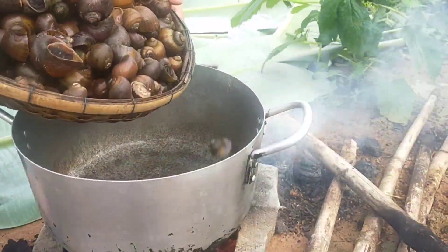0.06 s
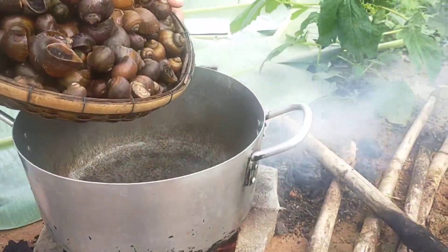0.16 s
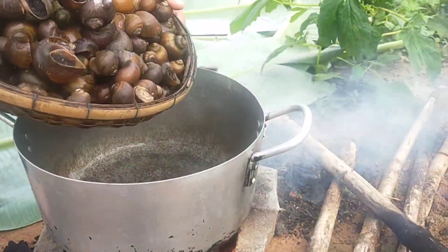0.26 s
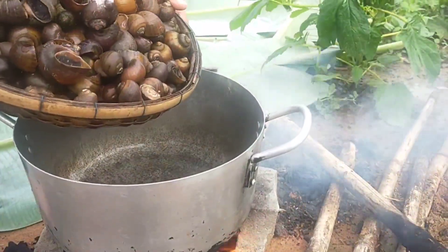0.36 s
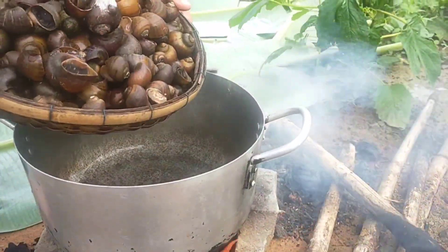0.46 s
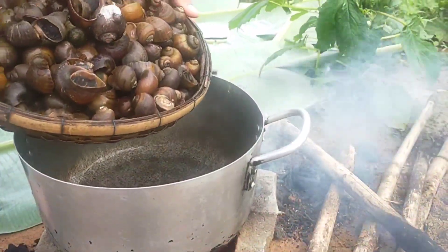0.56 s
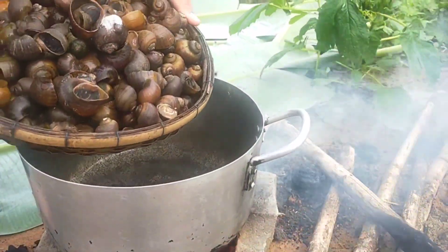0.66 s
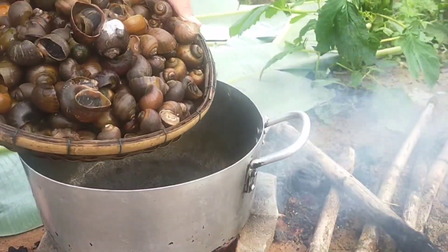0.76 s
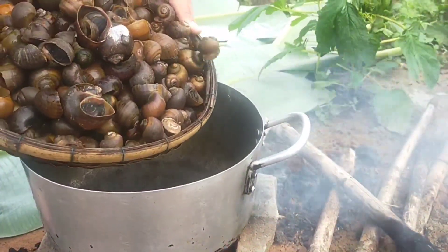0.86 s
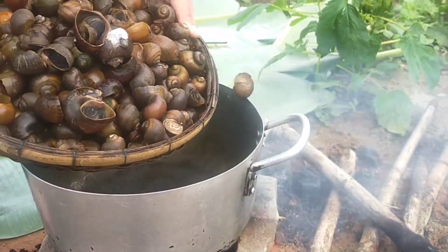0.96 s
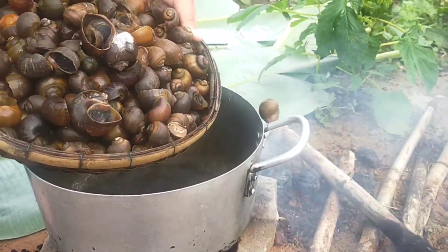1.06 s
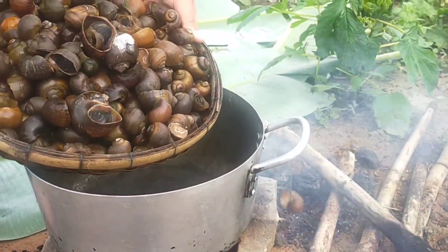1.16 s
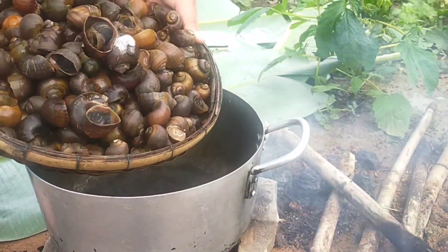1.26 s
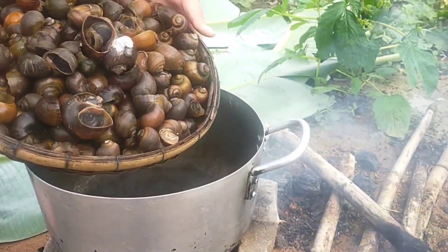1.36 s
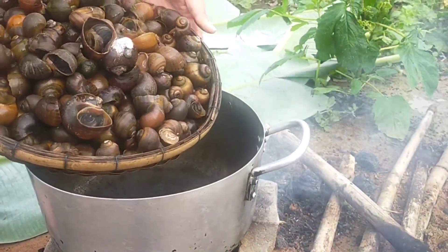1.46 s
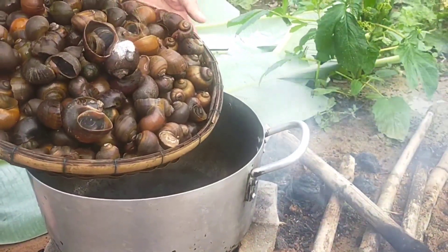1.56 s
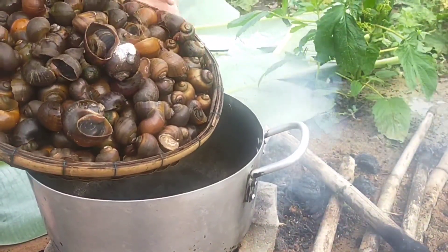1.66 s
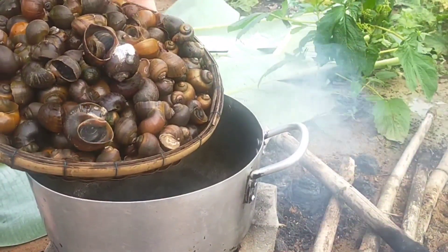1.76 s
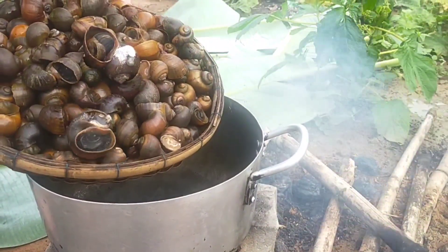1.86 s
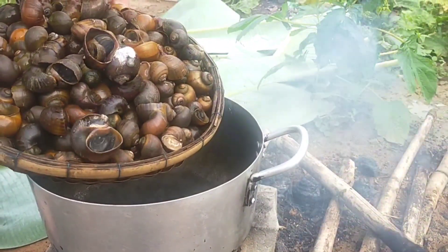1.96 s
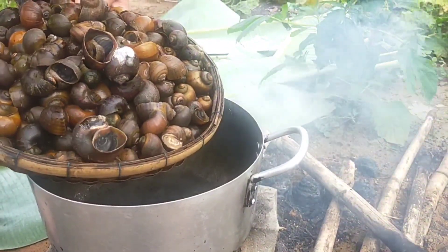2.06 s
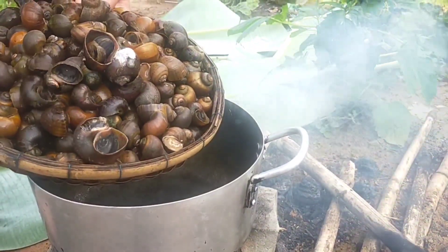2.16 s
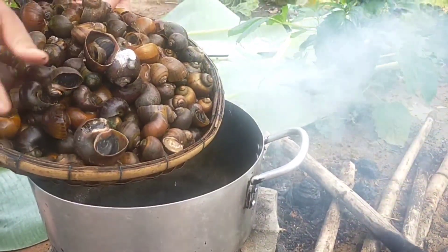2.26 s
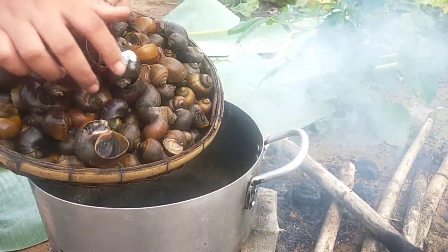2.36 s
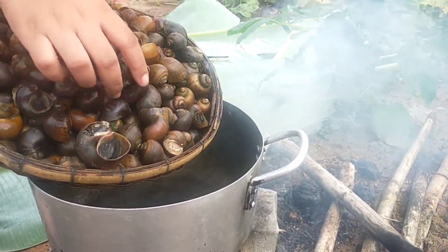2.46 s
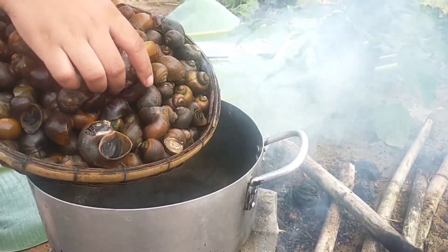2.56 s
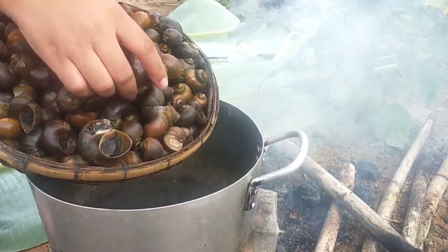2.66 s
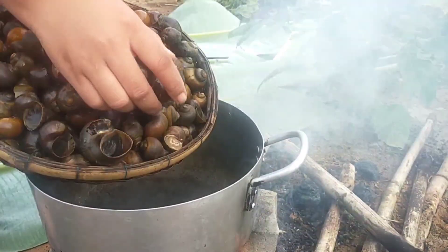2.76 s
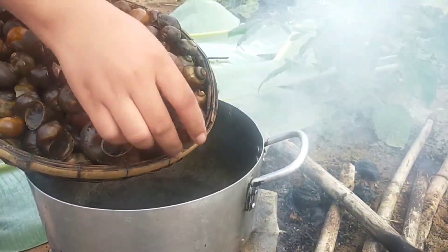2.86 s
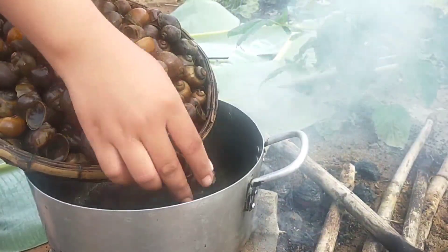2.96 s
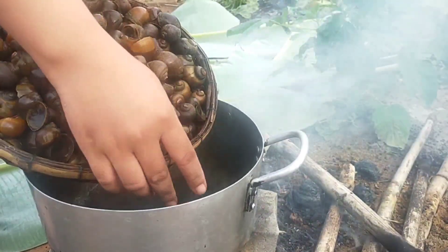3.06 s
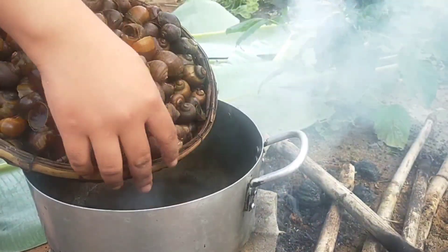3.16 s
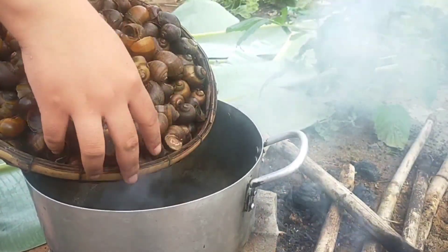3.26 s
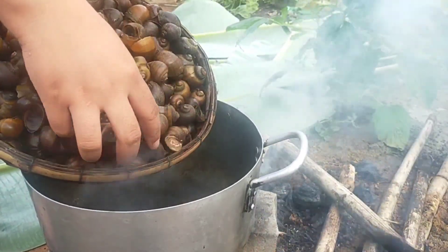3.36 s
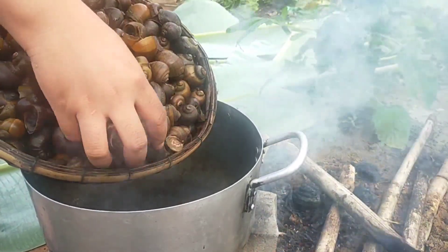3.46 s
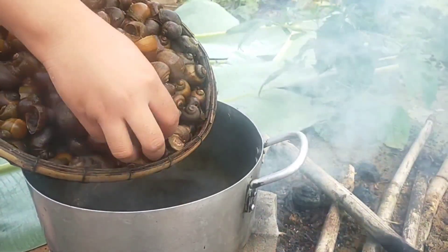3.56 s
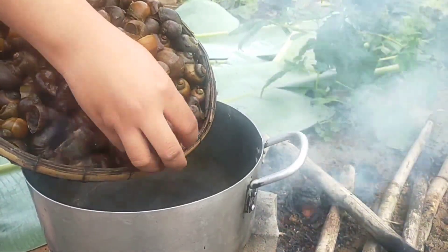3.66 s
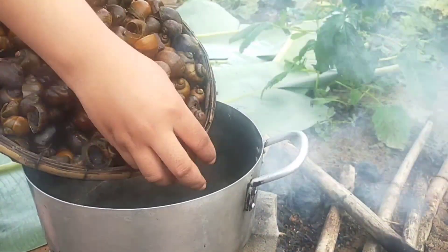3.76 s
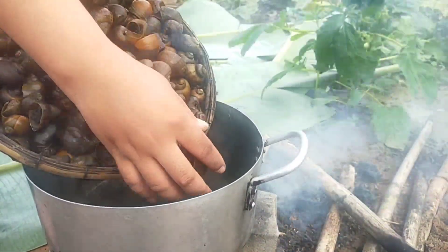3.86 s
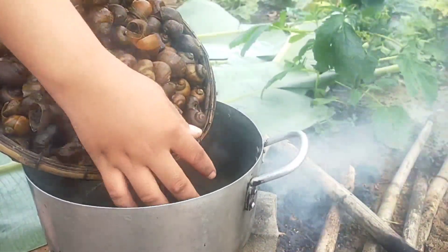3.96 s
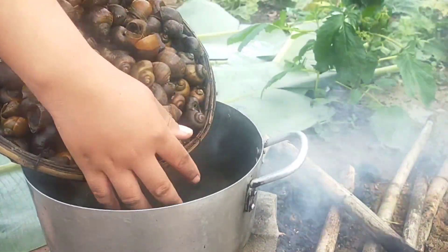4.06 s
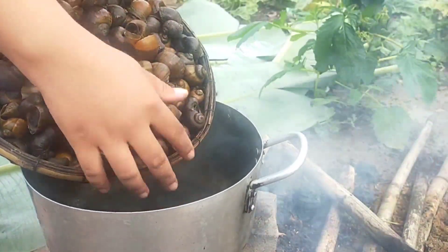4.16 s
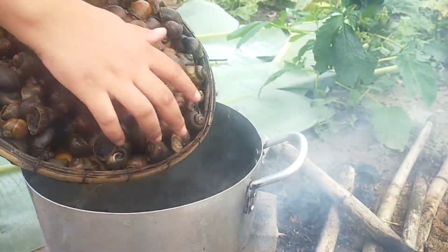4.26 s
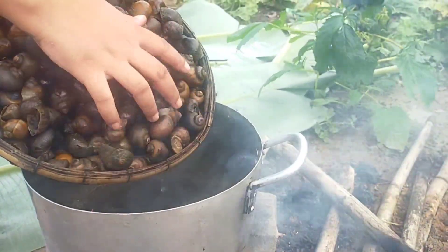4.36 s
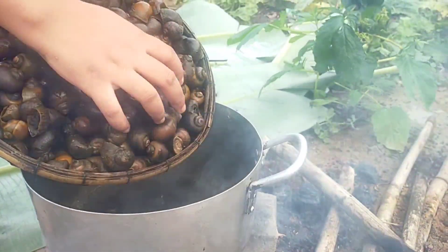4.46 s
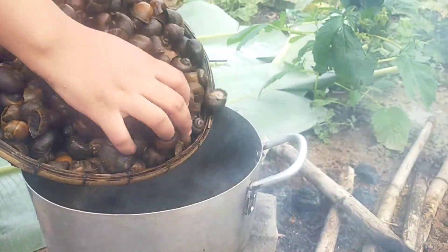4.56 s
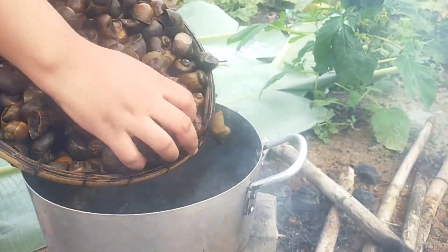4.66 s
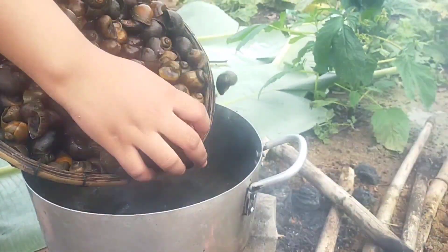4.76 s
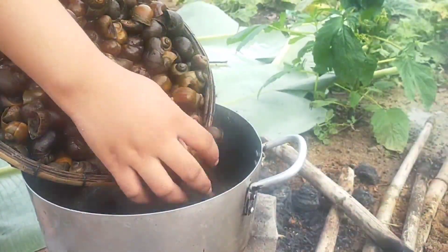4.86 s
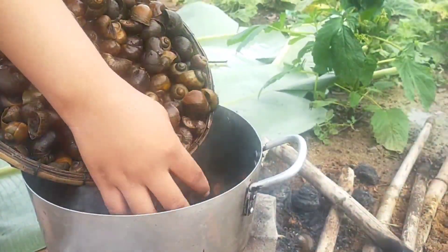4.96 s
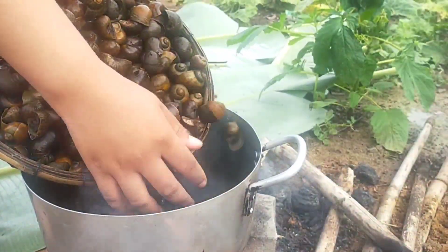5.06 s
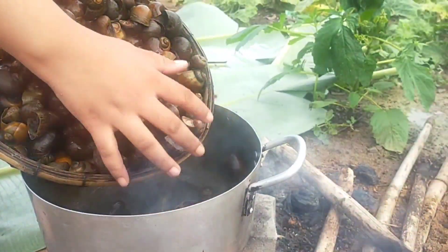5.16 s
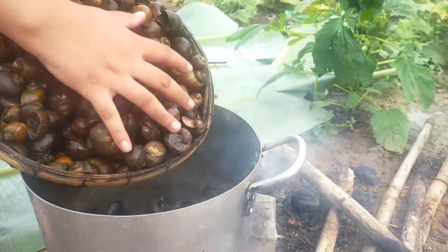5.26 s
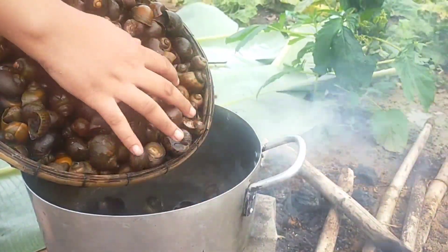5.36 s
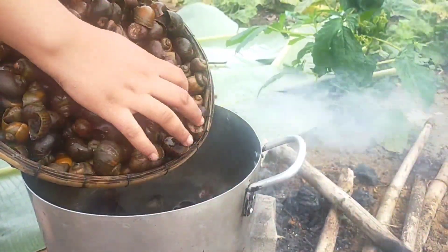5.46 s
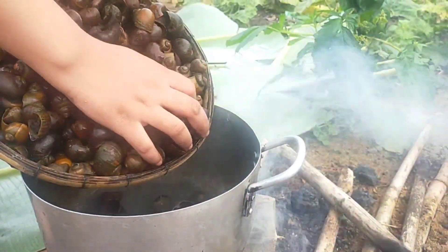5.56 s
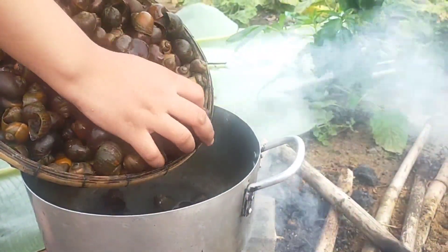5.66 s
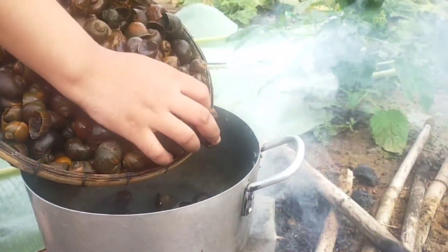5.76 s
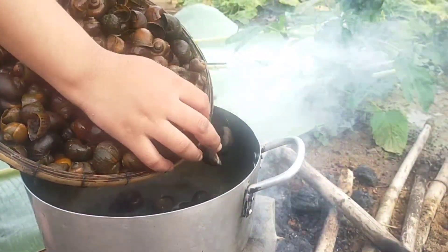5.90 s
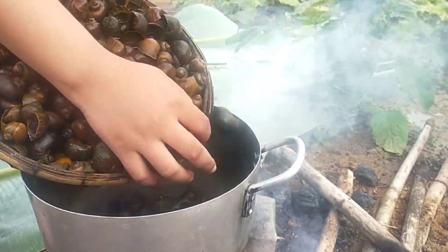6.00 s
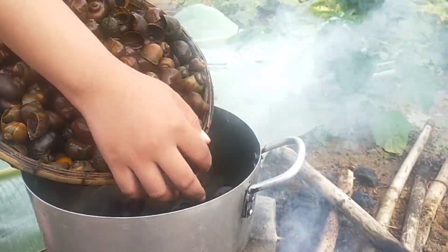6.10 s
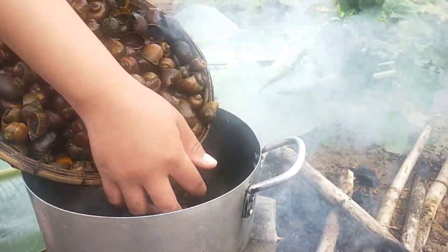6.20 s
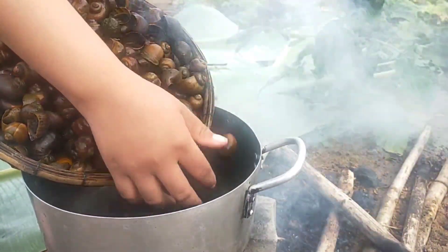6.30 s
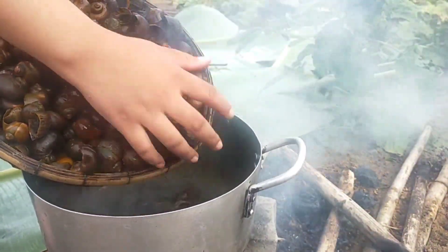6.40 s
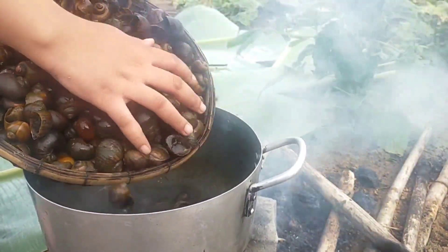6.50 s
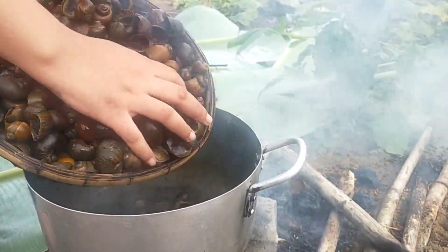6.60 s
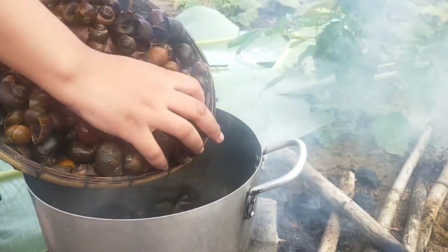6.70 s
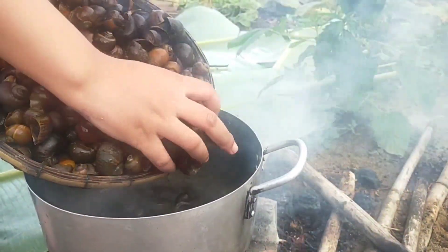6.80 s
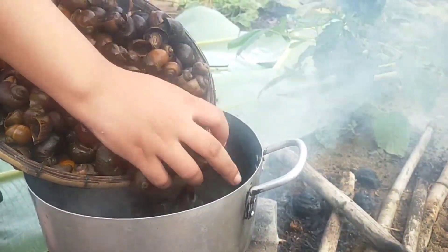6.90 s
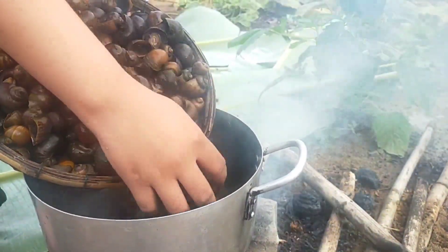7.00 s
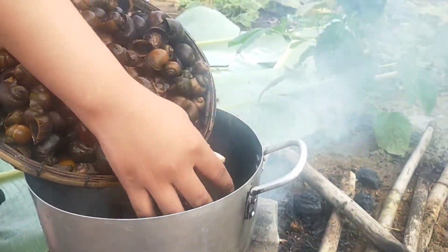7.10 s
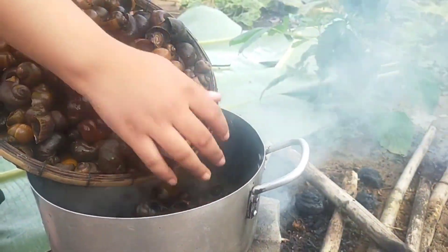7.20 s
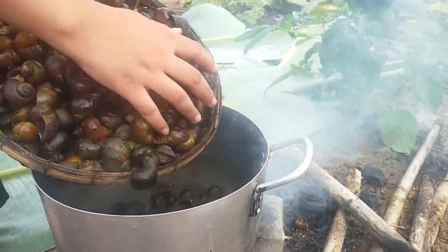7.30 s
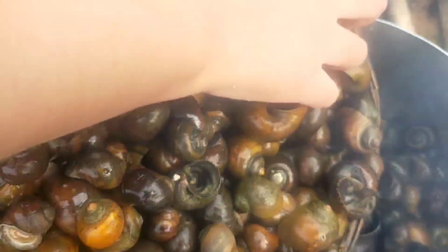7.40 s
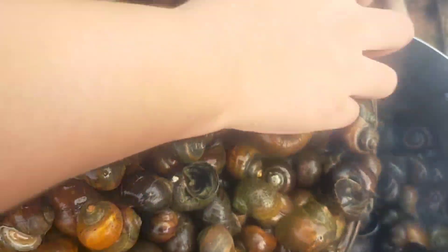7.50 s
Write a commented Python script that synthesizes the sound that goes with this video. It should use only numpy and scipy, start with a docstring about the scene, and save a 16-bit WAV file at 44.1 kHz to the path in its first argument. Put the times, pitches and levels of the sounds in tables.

```python
"""Outdoors, a steady fire hiss with insects and a low wind rumble come first, over shells ticking in a basket.
Snail shells are raked from the woven basket into a thin metal pot: they clack as short swelling partials,
thump the bottom and ring the wall as decaying modes, which are damped as the pot fills.
One quick scatter of touches hums on the wall, shells rub in the basket, a low hum swells, a bird calls once
as a falling whistle. The wind picks up late, and a bright swish of shaped noise passes close by at the end."""
import sys
import numpy as np
from scipy import signal
from scipy.fft import rfft, irfft, next_fast_len
from scipy.io import wavfile
from scipy.ndimage import uniform_filter1d, minimum_filter1d, map_coordinates

SR = 44100
rng = np.random.default_rng(int(sys.argv[2]) if len(sys.argv) > 2 else 0)


def wav_record(signal):
    """Record a signal, one row per channel, as 16-bit PCM in the file named by sys.argv[1]."""
    frames = np.transpose(np.atleast_2d(signal))
    bounded = np.clip(frames, -1, 1)
    # unit amplitude maps onto the largest positive 16-bit level
    quanta = np.round(bounded * 32767).astype(np.int16)
    wavfile.write(sys.argv[1], SR, quanta)


N = 332514


def amp(db):
    """Gain of a level in dB."""
    return 10 ** (np.asarray(db) / 20)


def unit(x):
    """Scaled to rms 1."""
    return x / np.sqrt(np.mean(x ** 2) + 1e-20)


def curves(rows):
    """One value per sample for each column after the time."""
    s, *cols = np.transpose(rows)
    return [np.interp(np.arange(N) / SR, s, c) for c in cols]


def wobble(rate):
    """A smooth random curve, rate knots a second."""
    knots = rng.standard_normal(int(N * rate / SR) + 4)
    return map_coordinates(knots, [np.arange(N) * rate / SR])


def noise(spectrum):
    """Noise of rms 1 coloured by (frequency [Hz], level [dB]) points, close to silent outside them."""
    m = next_fast_len(N)
    f, db = np.transpose(spectrum)
    log_f = np.log(np.fft.rfftfreq(m, 1 / SR) + 1)
    gain = amp(np.interp(log_f, np.log(f + 1), db, -120, -120))
    return unit(irfft(rfft(rng.standard_normal(m)) * gain, m)[:N])


def place(s, rows, size=N):
    """Sums one short sound per row at the times s."""
    at = np.round(s * SR).astype(int)[:, None] + np.arange(rows.shape[1])
    return np.bincount(at.ravel(), rows.ravel(), size + SR)[:size]


# fire hiss and insects in the open air: (frequency [Hz], relative level per Hz [dB])
AIR_SPECTRUM = [(150, -74), (250, -33), (303, -3.5), (407, 6.5), (1240, 0.5), (1450, 2), (3060, 10.5),
                (6940, -16.5), (9490, -22), (11100, -1.5), (16000, -70)]


def fire_and_insects():
    """Fire hiss and insects: one coloured noise whose level wavers a little, slowly and quickly."""
    return amp(-55 + .8 * wobble(3) + .8 * wobble(14)) * noise(AIR_SPECTRUM)


# low wind: (frequency [Hz], relative level per Hz [dB])
WIND_SPECTRUM = [(12, -61), (20, -28), (43, -3), (118, -6), (176, -11.5), (234, -17), (300, -25.5),
                 (390, -77), (660, -120)]
GUST_S, GUST_DB = 6.35, 4.5  # time the wind picks up [s], its gain [dB]


def wind_rumble():
    """Wind as wavering low noise that grows over 0.3 s when it picks up."""
    gust_db = GUST_DB * np.clip((np.arange(N) / SR - GUST_S) / .3, 0, 1)
    return amp(-55.5 + gust_db + wobble(1) + wobble(13)) * noise(WIND_SPECTRUM)


def shells(s, size, hz, t60, rise, spread, count=3):
    """Hollow shells: a few close partials around the pitch that swell and die fast; size is the peak."""
    t = np.arange(SR // 30) / SR
    c = rng.standard_normal((len(s), count, 3))
    part_hz = hz[:, None] * np.exp(spread * np.tanh(c[..., 0]) * np.arange(count) / 2)
    life = np.clip(t60 * np.exp(0.2 * c[..., 1]), .005, .06)
    shape = amp(-60 * t / life[..., None]) * (1 - np.exp(-t / rise))
    part_gain = amp(-4.0 * np.arange(count))[:, None]
    partials = np.sin(2 * np.pi * part_hz[..., None] * t + 9 * c[..., 2:])
    tone = (shape * part_gain * partials).sum(1)
    return place(s, tone * (size / np.abs(tone).max(1))[:, None])


def bursts(s, size, t60, rise=0.00063):
    """Envelope of sharp noise bursts."""
    t = np.arange(SR // 16) / SR
    return place(s, size[:, None] * amp(-60 * t / t60) * (1 - np.exp(-t / rise)))


# shells shifting in the basket: (time [s], level [dB], shell pitch [Hz])
BASKET_TICKS = [(0.021, -31.5, 2400), (0.06, -32.5, 2440), (0.105, -35, 2430), (0.1259, -30.5, 2200),
                (1.3125, -9.5, 2443), (1.361, -43, 1810), (1.4047, -37.5, 1660), (1.567, -35.5, 1940),
                (1.854, -34.5, 2620), (1.873, -40, 2610), (1.8932, -38, 2500), (1.9453, -34.5, 2630),
                (2.0707, -41.5, 2400), (2.235, -29.5, 2100), (2.3046, -45.5, 2460), (2.35, -36, 2350),
                (2.4273, -34.5, 2250), (2.4466, -26, 2490), (2.474, -34.5, 2630), (2.536, -30.5, 2840),
                (2.561, -30, 2790), (2.58, -31, 1430), (2.5975, -21.5, 2630), (2.7007, -40.5, 2200),
                (2.7821, -19, 3470), (2.8303, -29, 2550), (2.8598, -30, 2570), (2.9573, -43, 1730),
                (2.974, -41, 1740), (3.007, -32.5, 2210), (3.098, -26, 2930)]


def ticks():
    """In the basket a contact is only the shell and a short dry crack."""
    s, db, hz = np.transpose(BASKET_TICKS)
    body = shells(s, amp(db), hz, t60=0.032, rise=0.00014, spread=0.393, count=4)
    dry_noise = noise([(400, -42), (1000, 1.0), (3000, 11.0), (6000, -12.5), (16000, -39.0)])
    return body + bursts(s, amp(db - 2.0), 0.024) * dry_noise


def ring(modes, s, size, scatter_db, hz0=None, count=N):
    """Blows ring every mode at a new strength, most of all those near the striker's own pitch hz0."""
    chance = rng.standard_normal((len(s), len(modes)))
    out = np.zeros(count)
    for (hz, db, t60), c in zip(modes, chance.T):
        r, w = amp(-60 / (np.clip(t60, .01, .5) * SR)), 2 * np.pi * hz / SR
        near_db = 0 if hz0 is None else -7 * np.abs(np.log2(hz / hz0))
        sign = np.sign(np.sin(9 * c))  # a blow pushes a mode either way
        strength = size * amp(db + near_db + scatter_db * c) * sign
        blows = place(s, strength[:, None], count)
        out += signal.lfilter([0, np.sin(w)], [1, -2 * r * np.cos(w), r * r], blows)
    return out


# modes of the bare pot wall: (relative level [dB], 60 dB decay time [s])
WALL_MODES = [(-8.5, 0.15), (-19, 0.13), (-14.5, 0.17), (-8, 0.21), (-7.5, 0.17), (-6, 0.43), (-20, 0.15),
              (-15, 0.43), (-14.5, 0.28), (-18, .15), (-6, 0.29), (-12.5, 0.1), (-12.5, 0.4), (-12, .22),
              (-6.5, 0.3), (-14, 0.087), (-18, 0.35), (-9.5, 0.22), (-14, 0.29), (-13.5, .22), (-16, 0.21),
              (-13.5, 0.29), (-13, 0.24), (-15, 0.054), (-11.5, 0.074)]
# pitch of each of those modes on the bare wall: [Hz]
WALL_PITCHES = [1035, 1105, 1225, 1351, 1521, 1669, 1793, 1886, 1970, 2040, 2162, 2250, 2338, 2532, 2590,
                2835, 2977, 3135, 3208, 3451, 3682, 3872, 4414, 4603, 5313]
# the pot filling up: (time [s], share of the wall covered by shells [0 to 1])
COVERED = [(0, 0.037), (1.5, 0.18), (3.1, 0.48), (4.2, 0.71), (7.54, 0.98)]
SAG, DETUNE, DAMPING = .011, 0.0201, 3.1  # covered wall: mean pitch fall, pitch scatter, extra damping [ratios]
SETTLE_S = .3  # the heap lies differently against the wall this often [s]


def pot_wall(s, size, hz):
    """Shells against the wall damp it and split each mode in two; the pitches shift whenever the heap settles."""
    out = np.zeros(N + SR)
    length = SR * 3 // 4
    db, t60 = np.tile(np.transpose(WALL_MODES), 2)
    for k in range(int(N / SR / SETTLE_S) + 1):
        start = k * SETTLE_S
        fill = np.clip(np.interp(start, *np.transpose(COVERED)), 0, 1)
        shift = fill * (DETUNE * rng.standard_normal(len(db)) - SAG)
        tuned = np.tile(WALL_PITCHES, 2) * (1 + shift)
        modes = np.transpose([tuned, db - 3.5, t60 / (1 + DAMPING * fill)])
        now = s // SETTLE_S == k
        ringing = ring(modes, s[now] - start, size[now], scatter_db=5.0, hz0=hz[now], count=length)
        out[round(start * SR):][:length] += ringing
    return out[:N]


# modes of the pot bottom: (frequency [Hz], relative level [dB], 60 dB decay time [s])
BOTTOM_MODES = [(432.8, -3.5, 0.074), (500.5, -1, 0.04), (653, -2.5, 0.021), (1004, -13.5, 0.092)]


def pot_bottom(s, size, scatter_db):
    """The bottom drums in a few low modes at every blow."""
    return ring(BOTTOM_MODES, s, size, scatter_db)


# crack of shell on shell in the pot: (frequency [Hz], relative level per Hz [dB])
CRACK_SPECTRUM = [(530, -10.5), (900, -21.5), (1020, -2), (1120, -17.5), (2120, -0.5), (8660, -36.5),
                  (10800, -33), (16000, -44)]


def crack_noise(treble_only=False):
    """Noise of a cracking contact, over the whole band or with only the treble above 3 kHz."""
    if not treble_only:
        return noise(CRACK_SPECTRUM)
    bright = [(f, d) for f, d in CRACK_SPECTRUM if f > 3000]
    return noise([(3000, -10)] + bright)


# crowd drag: rattle gained per doubling [dB], span [s], delay [s], weight of a clack's level
DRAG_DB, DRAG_S, DRAG_LAG_S, DRAG_WEIGHT = 7.5, 0.029, 0.016, 0.53


def crowd(s):
    """How many shells are falling around the times s, loud ones counting more; they drag small ones along."""
    at, db = np.transpose(SHELL_FALLS)[:2]
    near = np.exp(-((s[:, None] - at - DRAG_LAG_S) / DRAG_S) ** 2)
    return (amp(DRAG_WEIGHT * db) * near).sum(1)


# how hard the heap is tipped and raked: (time [s], relative rattle level [dB])
RAKE_FORCE = [(0.1, -70), (.28, -39), (.48, -63), (.56, -44.5), (.8, -59.5), (.9, -60.5), (1.3, -80),
              (1.9, -83), (2.3, -80.5), (2.6, -56), (3.05, -66), (3.2, -39.5), (3.68, -50), (4.0, -57),
              (4.2, -42), (4.47, -49.5), (5.2, -39), (5.75, -53), (6.2, -48), (6.37, -59), (6.8, -46.5),
              (7.54, -46.5)]


def rattle(count=4200):
    """Countless small contacts of random size follow the raking and swell where shells fall in a crowd."""
    c = rng.random((count, 4))
    s = c[:, 0] * (N / SR - .01)
    rake_db = np.interp(s, *np.transpose(RAKE_FORCE))
    drag_db = DRAG_DB * np.log2(1 + crowd(s))
    size = amp(rake_db + drag_db - 5.0 + 18.6 * c[:, 1] ** 3)
    hz = 1200 * np.exp(1.0 * c[:, 2])
    body = shells(s, size * amp(-2.0), hz, t60=0.015, rise=0.0014, spread=0.39, count=2)
    crack = bursts(s, size, 0.015) * crack_noise()
    drum = pot_bottom(s, size * amp(-11.0) * c[:, 3], scatter_db=5.5)
    return body + crack + pot_wall(s, size * amp(-11.5), hz) + drum


# landings on the pot bottom: (time [s], relative level [dB])
LANDINGS = [(0.164, -14.5), (0.214, -11.5), (0.246, -15), (0.277, -19), (0.378, -12.5), (0.77, -12),
            (0.945, -12.5), (1.024, -18), (3.134, -5), (3.181, -17.5), (3.35, -10), (3.46, -11),
            (3.661, -14.5), (4.051, -7), (4.074, -19), (4.161, -15.5), (4.274, -19), (4.383, -20.5),
            (4.772, -14.5), (4.824, -19.5), (4.95, -11.5), (4.991, -22), (5.019, -20), (5.049, -24),
            (5.144, -16), (5.233, -15), (5.331, -24), (5.943, -13.5), (6.007, -20), (6.043, -13.5),
            (6.162, -11), (6.271, -18.5), (6.42, -16), (6.993, -8), (7.032, -14), (7.076, -9),
            (7.115, -9.5), (7.298, -22)]


def thumps():
    """A shell lands on the bottom and drums it; the soft contact dulls the blow."""
    s, db = np.transpose(LANDINGS)
    drum = pot_bottom(s, amp(db - 7), scatter_db=-1.0)
    return signal.lfilter(*signal.butter(2, 1100, fs=SR), drum)


# shells falling in the pot: (time [s], relative level [dB], shell pitch [Hz],
# relative crack level [dB], relative pot wall ring level [dB])
SHELL_FALLS = [(0.167, -11, 2980, -7, 8.5), (0.252, -13, 2020, -20, 9.5), (0.2803, -17.5, 1600, -12, 11),
               (0.4085, -22, 2210, -43, -0.5), (0.6528, -10, 2300, -64, -28), (0.7156, -15, 1613, -42, -18),
               (0.7758, -21.5, 1100, -43, -4.5), (0.9311, -11, 1830, -44, 4.5),
               (1.0237, 1, 2770, -22.5, -11), (3.1357, -6, 1980, -14.5, 6), (3.255, -25, 3400, 1, 2),
               (3.2961, 1.5, 1620, -23, -7.5), (3.3493, -3.5, 2035, -29, -1), (3.4102, -16.5, 2360, -19, 0),
               (3.4594, -7.5, 2470, -20.5, 3), (3.5974, -8.5, 2390, -35, 2.5), (3.6302, -16, 1610, -54, 10),
               (3.6643, -10, 2530, -41, -5), (3.704, -10, 3050, -31, -22), (3.799, -14, 1975, -24, -1),
               (3.9203, -20, 2600, -14.5, -19), (4.0458, 8, 1635, -42, -2.5), (4.141, -14, 1680, -19, 2),
               (4.1715, -12, 1160, -26, 4.5), (4.2278, -5.5, 1640, -44, -1), (4.2727, -1, 1970, -26.5, -26),
               (4.345, -13, 1620, -22.5, 3.5), (4.385, -12, 1610, -48, -0.5),
               (4.5165, -19, 3860, -19.5, -1), (4.65, -7.5, 2050, -51, -2.5), (4.7309, -18, 2650, -11, 9.5),
               (4.77, -17, 1250, -2, 11), (4.7992, 1.5, 1690, -23.5, -6), (4.8357, -4, 1930, -19, -1.5),
               (4.957, -19.5, 1660, -23, 9.5), (4.9647, -18, 1780, -11, 10.5),
               (4.993, -0.5, 1950, -20.5, -2.5), (5.025, -4.5, 2000, -20.5, -3),
               (5.0473, -11.5, 1230, -12.5, 10.5), (5.0748, 3, 2096, -29.5, -17),
               (5.1478, -4, 2520, -22, -0.5), (5.2104, -14.5, 1320, -26, 6), (5.236, 1, 2714, -23.5, -36),
               (5.2618, -22, 1330, 0, 18.5), (5.2848, 1, 2300, -20.5, -5), (5.3242, -15, 1325, -22, 6.5),
               (5.3465, -8.5, 2280, -52, -11), (5.4152, -9.5, 2060, -27, -22), (5.431, -12, 1850, -50, 2.5),
               (5.501, -19.5, 3340, -15, -12), (5.5353, -16.5, 2410, -28, -2),
               (5.592, -21.5, 2490, -21, 1.5), (5.6327, -18.5, 1760, -14.5, 4.5),
               (5.6632, -18.5, 1540, -26, -6), (5.7152, -21.5, 2120, -18, 3), (5.8742, -18, 1325, -15, 7),
               (5.906, -15.5, 2670, -30, 1), (5.9438, -3.5, 1620, -24.5, -4.5), (6.009, 1, 1614, -26, -26),
               (6.0306, -5, 1640, -22, -15), (6.0418, -2, 1756, -16, -5), (6.059, 6, 1577, -24.5, -6),
               (6.112, -12, 1580, -23, -22), (6.1657, -4, 1650, -25, -1), (6.195, -11.5, 1550, -19.5, -1.5),
               (6.2717, -9.5, 1040, -25, 2.5), (6.2988, -9, 2166, -29, -33), (6.4225, 0, 2163, -28, -2.5),
               (6.479, -19.5, 1725, -29, -5), (6.55, -15, 2980, -25, -0.5), (6.622, -19, 2290, -16.5, -1),
               (6.6458, -7, 2430, -23, -0.5), (6.6626, 1, 1492, -26, -29), (6.7221, 1.5, 2005, -28, -8),
               (6.768, -7, 1577, -21, 2.5), (6.94, -25.5, 2200, -10, -8), (6.9923, -5.5, 1620, -27, -16),
               (7.034, -1.5, 2030, -27.5, -8), (7.0779, 8, 2424, -61, -8), (7.1178, -0.5, 1980, -24, -2),
               (7.1368, -11, 2610, -9, 6), (7.157, -2, 1608, -27, -3.5), (7.2118, -8.5, 1550, -17.5, -22),
               (7.2402, -12, 1643, -21, 5), (7.2509, -18, 1490, -26, 11), (7.2783, -7.5, 1550, -23.5, -20),
               (7.2988, -1, 2216, -28, -2.5), (7.3261, 0, 3160, -22.5, -15), (7.428, -21.5, 1510, -17.5, 6),
               (7.521, -20, 1553, -10.5, 5)]
# chatter: mean gap between touches [s], loss per gap away from the nominal time [dB],
# lead of the first touch over the nominal time [gaps]
CHATTER_S, CHATTER_DB, LEAD_IN = .0032, 5.5, 0.35


def clacks(count=4):
    """Each contact chatters: a strong first touch, then mostly weaker ones; all sound shell, crack and wall."""
    s, db, hz, crack_db, wall_db = np.repeat(SHELL_FALLS, count, axis=0).T
    c = rng.random((len(SHELL_FALLS), count, 2))
    touch = np.arange(count)
    late = ((touch + 0.852 * (c[..., 0] - .5)) * (touch > 0)).ravel()
    off_nominal = late - LEAD_IN
    s = s + CHATTER_S * off_nominal
    db = db - 2 - CHATTER_DB * np.abs(off_nominal) - 3 * c[..., 1].ravel()
    body = shells(s, amp(db - 9.0), hz, t60=0.048, rise=0.00052, spread=0.256)
    tail = bursts(s, amp(db + crack_db - 5), 0.067)
    snap = bursts(s, amp(db + crack_db + 5), 0.0092, rise=0.00019)
    crack = (tail + snap) * crack_noise(treble_only=True)
    puff = bursts(s, amp(db - 25), 0.055) * crack_noise()
    return body + crack + puff + pot_wall(s, amp(db + wall_db - 9.0), hz)


# the two ends of the brief scatter [s], in either order; least blow on the wall [dB]
SCATTER_S, SCATTER_DB = (0.6, 0.58), -48.5


def touch_scatter(count=90):
    """A quick scatter of tiny touches makes the wall hum briefly."""
    c = rng.random((count, 2))
    s = SCATTER_S[0] + (SCATTER_S[1] - SCATTER_S[0]) * c[:, 0]
    return pot_wall(s, amp(SCATTER_DB + 2.7 * c[:, 1]), np.full(count, 1900))


# swells of a low hum: (time [s], level [dB])
HUM_SWELLS = [(1.27, -55), (2.22, -47.5), (3.45, -49), (4.22, -49.5), (4.8, -50.5), (5.22, -53.5),
              (5.8, -56)]


def hum():
    """A sine near 122 Hz, slightly unsteady in pitch, rises and falls in smooth swells."""
    t = np.arange(N) / SR
    swell = sum(amp(db) * np.exp(-((t - s) / 0.11) ** 2) for s, db in HUM_SWELLS)
    return swell * np.sin(2 * np.pi * np.cumsum(122 + 1.43 * wobble(4.67)) / SR)


# shells rubbing in the basket: (start time [s], end time [s], least level of a touch [dB])
BASKET_RUBS = [(1.4, 1.55, -53.5), (1.88, 2.02, -51.5), (2.43, 2.62, -49.5)]


def rubs(count=40):
    """Soft short tones of many pitches while shells slide over each other."""
    start, end, db = np.repeat(BASKET_RUBS, count, axis=0).T
    c = rng.random((len(db), 3))
    s = start + (end - start) * c[:, 0]
    size = amp(db + 5.6 * c[:, 1] ** 2)
    hz = 1050 * np.exp(1.15 * c[:, 2])
    return shells(s, size, hz, t60=0.033, rise=0.0037, spread=0.32, count=2)


# one bird call: (time [s], pitch [Hz], level [dB])
BIRD_CALL = [(1.775, 5860, -80), (1.79, 5500, -64), (1.83, 3970, -56), (1.86, 3600, -59)]


def bird():
    """A single falling whistle: one sine gliding down in pitch."""
    t = np.arange(N) / SR
    hz, db = curves(BIRD_CALL)
    calling = (t > BIRD_CALL[0][0]) * (t < BIRD_CALL[-1][0])
    return amp(db) * calling * np.sin(2 * np.pi * np.cumsum(hz) / SR)


# a bright swish close by: (time [s], level [dB])
SWISH_LEVEL = [(7.36, -76.5), (7.375, -39.5), (7.41, -47.5), (7.45, -50), (7.54, -52)]


def swish():
    """Treble noise that jumps up fast and fades."""
    bright_noise = noise([(4000, -5), (7000, -4), (9500, -26), (12000, 1.5), (16000, -11)])
    return amp(curves(SWISH_LEVEL)[0]) * bright_noise


def scene():
    """Pot and basket, cut below 300 Hz where the small pot radiates little, amid the open air."""
    outdoors = fire_and_insects() + wind_rumble() + hum() + bird() + swish()
    contacts = ticks() + rattle() + thumps() + clacks() + touch_scatter() + rubs()
    low_cut = signal.butter(4, 300, "high", fs=SR, output="sos")
    return (signal.sosfilt(low_cut, contacts) + outdoors)[None]


TOP_HZ = 15900  # band limit [Hz]


def record(dry):
    """After the single microphone a fast limiter holds the peaks; nothing is kept above the band limit."""
    need = np.minimum(1, .5 / (np.abs(dry) + 1e-9))
    gain = uniform_filter1d(minimum_filter1d(need, size=81), size=41)
    m = next_fast_len(N)
    in_band = np.fft.rfftfreq(m, 1 / SR) < TOP_HZ
    return irfft(rfft(dry * gain, m) * in_band, m)[..., :N]


dry = scene()
out = record(dry)
wav_record(out)
```